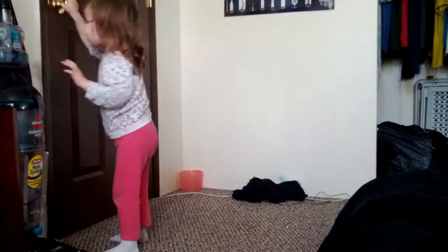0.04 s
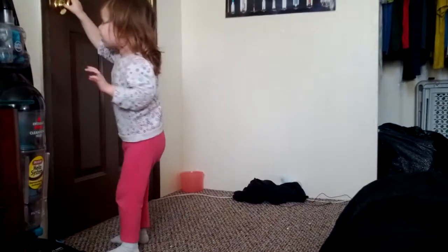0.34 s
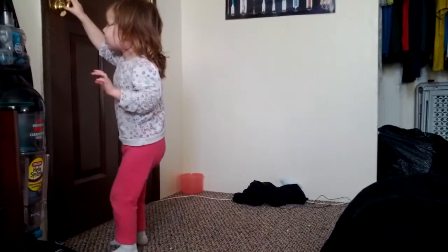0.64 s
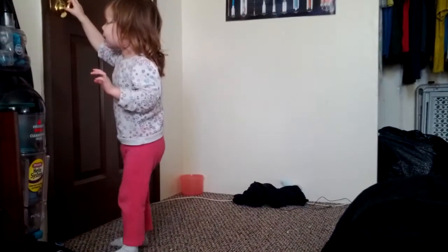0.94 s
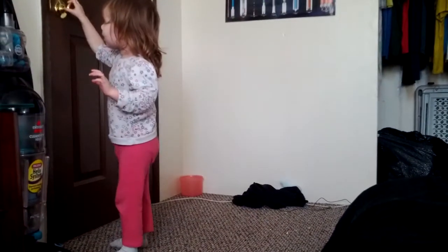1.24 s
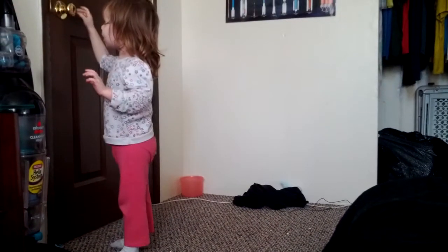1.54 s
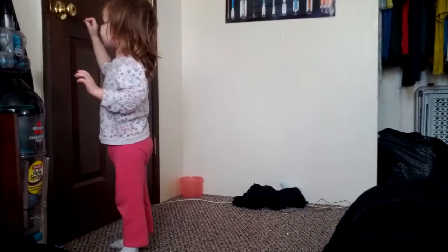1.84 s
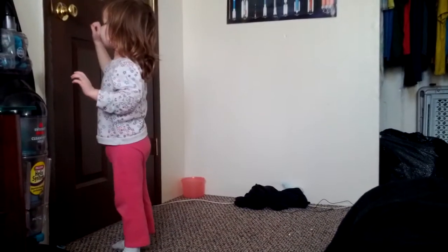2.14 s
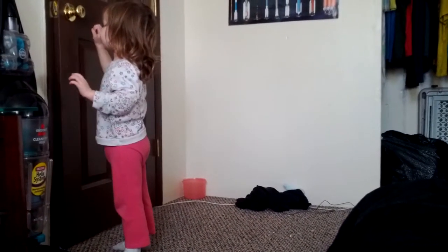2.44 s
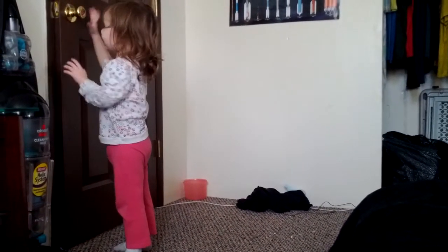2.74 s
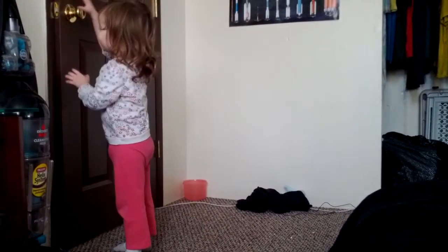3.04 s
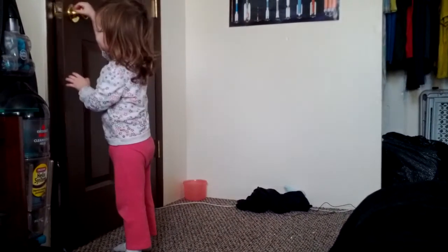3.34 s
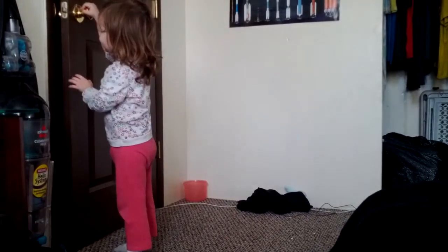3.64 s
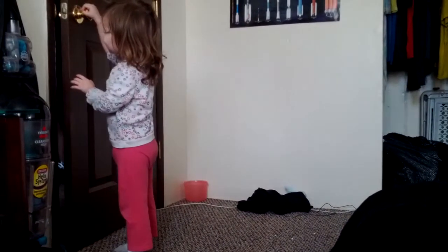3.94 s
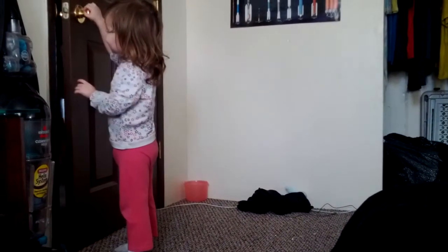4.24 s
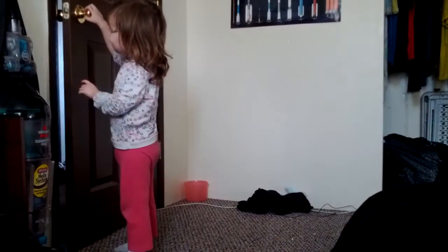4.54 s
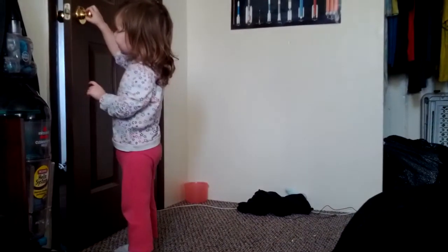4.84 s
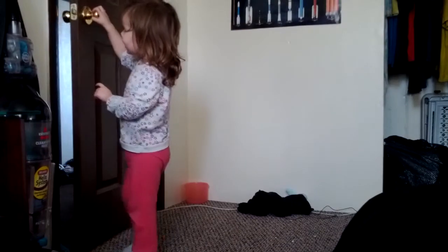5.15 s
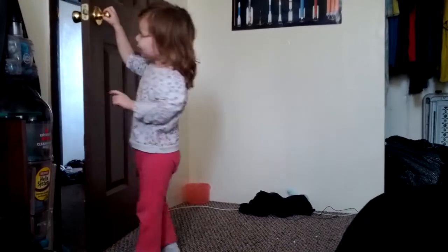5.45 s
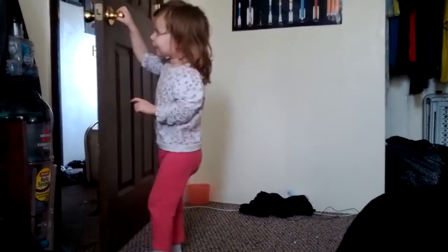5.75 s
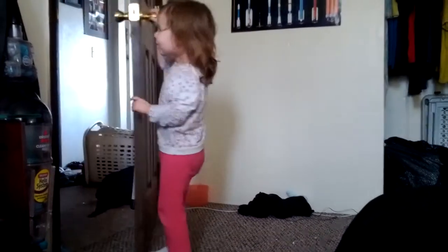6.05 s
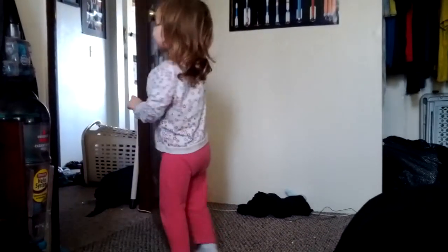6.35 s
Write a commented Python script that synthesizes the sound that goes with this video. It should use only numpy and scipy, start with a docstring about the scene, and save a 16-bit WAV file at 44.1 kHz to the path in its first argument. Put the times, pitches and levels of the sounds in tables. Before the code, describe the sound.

A wooden bedroom door is knocked about lightly as a child fiddles with its metal knob, which rattles and springs back sharply. A deep thump against the frame and a bright latch click follow. Faint brushing of clothes and feet fills a pause before the door is pulled open with a brief swish and bumps to a stop. The room rings only briefly, with soft steady hiss and a little air rumble on the microphone.

```python
"""The brass knob and latch of a wooden door, worked by a small child in a carpeted bedroom.
The knob rattles and snaps back, the door is pushed against its frame and the latch clicks home:
each impact excites damped modes of brass and wood, and the room adds a short reverberation.
Then the door is pulled open with a brief hiss of friction and bumps to a stop.
Beneath it lie the rumble of stirred air, a low house drone, steady hiss and faint camera ticks."""
import sys
import numpy as np
from scipy import signal
from scipy.fft import rfft, irfft
from scipy.io import wavfile

SR = 44100
rng = np.random.default_rng(int(sys.argv[2]) if len(sys.argv) > 2 else 0)


def wav_record(signal):
    """Record a signal, one row per channel, as 16-bit PCM in the file named by sys.argv[1]."""
    frames = np.transpose(np.atleast_2d(signal))
    bounded = np.clip(frames, -1, 1)
    # unit amplitude maps onto the largest positive 16-bit level
    quanta = np.round(bounded * 32767).astype(np.int16)
    wavfile.write(sys.argv[1], SR, quanta)


N = 287091
TIME = np.arange(N) / SR

# reverberation time of the bedroom: f/Hz, T60/s
ROOM_DECAY = [(100, 0.5), (400, 0.23), (1200, 0.32), (3000, 0.2551), (7000, 0.3139), (14000, 0.19)]
# gain of the reverberant field: f/Hz, level/dB
ROOM_GAIN = [(100, 5), (1000, -1.5), (3000, -3), (7000, -4), (11500, 0), (14000, -8.5)]
# spectrum of the microphone hiss: f/Hz, relative level/dB
HISS_SPECTRUM = [(40, -4), (90, -6), (160, -12.5), (300, -17.5), (700, -21.5), (2000, -25), (5000, -27),
                 (9500, -25.5), (12200, -21.5), (14000, -24.5)]
# dry ticks inside the camera: t/s, relative level/dB
CAMERA_TICKS = [(0.298, -24.5), (.6663, -27.5), (1.5831, -23), (2.8633, -22.5), (4.1432, -24.5),
                (5.4235, -23)]
# spectrum of a tick: f/Hz, level/dB
TICK_SPECTRUM = [(1500, -32), (4000, -15), (6500, -9.5), (9500, -9), (11000, -2.5), (12400, 2),
                 (13800, -47)]
# air pushed at the microphone by door and child: t/s, level/dB
AIR_PUFFS = [(0.0, -46.5), (1.74, -47), (2.08, -48), (2.33, -44), (3.2, -38), (4.24, -57), (4.97, -58),
             (5.99, -48.5)]
# spectrum of the stirred air: f/Hz, relative level/dB
AIR_SPECTRUM = [(6, -6.5), (16, 6.5), (30, -4), (50, -13.5), (90, -14.5), (200, -46.5), (800, -69)]
# feet and clothes brushing: centre t/s, duration/s, level/dB
BRUSHES = [(0.107, 0.46, -76), (1.155, 0.14, -66), (2.08, 0.23, -57.5), (2.373, 0.23, -55),
           (4.212, 0.095, -68.5), (4.326, 0.15, -67.5), (5.045, 0.12, -66), (5.58, 0.19, -65),
           (6.096, 0.25, -56.5), (6.467, 0.083, -65)]
# spectrum of that brushing: f/Hz, relative level/dB
BRUSH_SPECTRUM = [(60, 11), (180, 4), (450, 0.5), (800, -7), (1200, -8.5), (4000, -11.5), (13000, -19)]
# spectrum of a hand sliding over the door: f/Hz, relative level/dB
SLIDE_SPECTRUM = [(150, -33), (500, -12.5), (1400, -10.5), (3000, -11), (6000, -7), (9000, -4), (11500, 2),
                  (13500, 2.5), (15000, -7), (16000, -40)]
# knocks of hand and knob on the wood: t/s, relative level/dB, low-pass f/Hz, chatter decay/s
PANEL_KNOCKS = [(0.033, -6, 380, 0.0041), (0.076, -9.5, 350, 0.013), (1.011, -17.5, 520, 0.0065),
                (1.126, -18.5, 520, 0.0095), (1.969, -6.5, 1140, 0.0057), (2.043, -10.5, 2200, .015),
                (2.085, -18, 1400, 0.016), (2.158, -5.5, 5600, 0.0067), (2.548, -6, 1540, .01),
                (3.064, -13.5, 4030, 0.0058), (3.075, -5.5, 2700, 0.0052), (3.274, 2.5, 2300, 0.0045),
                (5.476, -23, 3010, .004), (5.988, 4, 1007, 0.0055), (6.287, -18, 900, 0.01)]
# response of the wooden panel: f/Hz, level/dB
PANEL_SPECTRUM = [(50, -20), (130, 2.5), (240, -7), (380, -2.5), (520, -5.5), (730, -5), (1020, -3.5),
                  (1450, -5.5), (2200, -4.5), (3400, -4.5), (4400, -4), (5500, -7.5), (7500, -11),
                  (10000, -10)]
# blows that shake the whole door: t/s, impulse level/dB, contact time/s
DOOR_BLOWS = [(1.75, -31, 0.006), (2.092, -21.5, 0.0045), (2.156, -19.5, 0.0035), (2.293, -22, 0.0033),
              (2.34, -24, 0.002), (2.413, -16, 0.0011), (3.2042, 2.5, 0.0021), (3.261, -12.5, 0.0027),
              (5.974, -11, 0.0025), (5.981, -4, 0.0058), (6.112, -18, 0.0056), (6.222, -31.5, 0.0036)]
# modes of the door leaf in the room: f/Hz, level/dB, T60/s
LEAF_MODES = [(50.5, -38, .5), (86.4, -38.5, 0.1), (98.8, -23.5, .26), (110, -32.5, 0.18),
              (127.2, -30.5, 0.59), (161.8, -30, 0.39), (188.5, -34, 0.33), (223, -30.5, 0.23),
              (237.9, -38, 0.37), (323.6, -45, .3), (404.4, -28.5, .2), (399.9, -33, 0.21),
              (424.7, -43.5, .27), (519, -39.5, 0.33)]
# spectrum that a blow radiates into the room: f/Hz, level/dB
BLOW_SPECTRUM = [(30, 4), (100, 17.5), (220, 15.5), (400, 17.5), (560, 7.5), (700, 3), (1500, -1),
                 (6000, -14.5)]
# modes of the wood and strike plate around the lock: f/Hz, bandwidth/Hz, level/dB
LOCK_MODES = [(230.2, 22, 12), (500, 130, -2.5), (984, 200, 7), (1392, 710, 0.5), (2000, 930, -3),
              (4400, 300, 0)]
# modes of the brass latch and knob: f/Hz, bandwidth/Hz, level/dB
BRASS_MODES = [(2600, 300, -15.5), (3910, 330, -1), (6260, 120, 5.5), (6694, 230, 2), (7400, 90, -4.5),
               (8830, 180, 3.5), (9326, 88.1, 4.5), (10810, 200, 2), (11710, 260, 4.5), (12350, 100, 5)]
# knob and latch contacts:
# t/s, relative level/dB, wood gain/dB, top treble gain/dB, chatter decay/s, brass ring gain/dB
LATCH_CONTACTS = [(2.155, -17.5, 6, -19, 0.0061, -11), (2.388, -26, 17, 3.5, .006, 8.5),
                  (2.398, -34, 13, 1.5, 0.0073, 0), (2.4103, 9, -4.5, -2, 0.002, -1),
                  (2.4151, -8, -1.5, -7, 0.0019, 4), (3.211, -19.5, 8, 2, 0.0046, -13),
                  (3.266, 0, 0.5, 3, 0.0022, -4), (3.2711, -8.5, 1.5, 10.5, 0.0021, -2.5),
                  (5.9853, -19, 3, 13, 0.005, -10), (5.999, -21.5, -11, 11.5, 0.022, -4)]


def from_db(db):
    """Amplitude ratio: a factor of ten for every 20 dB."""
    return 10 ** (np.asarray(db) / 20)


def unit_rms(x):
    """Normalisation to unit mean power."""
    return x / np.sqrt(np.mean(x ** 2) + 1e-20)


def at_hz(points, hz):
    """Interpolation of a table on a logarithmic frequency axis."""
    f, value = np.transpose(points)
    return np.interp(np.log(np.maximum(hz, 1)), np.log(f), value)


def onset(s, attack_s):
    """Linear attack from zero to one, starting at time s."""
    return np.clip((TIME - s) / attack_s, 0, 1)


def swell(s, length_s):
    """Gaussian envelope centred on time s."""
    return np.exp(-(2 * (TIME - s) / length_s) ** 2)


def add(track, s, sound):
    """Superposition of a sound on a track at time s."""
    start = int(s * SR)
    track[start:start + len(sound)] += sound[:N - start]


def convolve(x, response):
    """A linear system convolves its input with its impulse response."""
    return signal.fftconvolve(x, response)[:len(x)]


def coloured(x, spectrum, size=8192):
    """Minimum-phase filtering: folding the cepstrum makes the given spectrum causal."""
    gain = from_db(at_hz(spectrum, np.fft.rfftfreq(size, 1 / SR)))
    cepstrum = irfft(np.log(gain))
    cepstrum[1:size // 2] *= 2
    cepstrum[size // 2 + 1:] = 0
    return convolve(x, irfft(np.exp(rfft(cepstrum))))


def resonance(x, hz, width_hz):
    """A damped two-pole resonator with unit peak gain."""
    radius = np.exp(-np.pi * width_hz / SR)
    numerator = np.array([1, 0, -1]) * (1 - radius ** 2) / 2
    denominator = [1, -2 * radius * np.cos(2 * np.pi * hz / SR), radius ** 2]
    return signal.lfilter(numerator, denominator, x + 1e-18)


def ring(contact, modes, uneven_db):
    """Modal superposition: each contact excites the modes with random strengths of its own."""
    return sum(from_db(db + uneven_db * rng.standard_normal()) * resonance(contact, hz, width)
               for hz, width, db in modes)


def chatter(decay_s, size=4096):
    """Contact chatter: tiny impacts merge into a decaying broadband burst of unit energy."""
    t = TIME[:size]
    envelope = (1 - np.exp(-4 * t / decay_s)) * np.exp(-t / decay_s)
    spectrum = rfft(rng.standard_normal(size) * envelope)
    whitened = irfft(spectrum / np.abs(spectrum))
    burst = whitened * np.sqrt(envelope)
    return burst / np.linalg.norm(burst)


def friction(spectrum, grain_db):
    """Friction noise: dense slips whose sizes scatter by grain_db."""
    slips = rng.standard_normal(N) * from_db(grain_db * rng.standard_normal(N))
    return unit_rms(coloured(slips, spectrum))


def bedroom(x, first_echo_s=0.00035, build_s=0.0041):
    """Diffuse reverberation: reflections build up, then decay exponentially at each band's own rate."""
    t, response = TIME[:SR], 0
    build_up = onset(first_echo_s, build_s)[:SR]
    edges = np.geomspace(40, 18000, 16)
    for low, high in zip(edges, edges[1:]):
        hz = np.sqrt(low * high)
        bandpass = signal.butter(2, (low, high), "band", fs=SR, output="sos")
        noise = signal.sosfilt(bandpass, rng.standard_normal(SR))
        tail = noise * build_up * from_db(-60 * t / at_hz(ROOM_DECAY, hz))
        gain = np.sqrt(2 * (high - low) / SR) * from_db(at_hz(ROOM_GAIN, hz))
        response = response + gain * tail / np.linalg.norm(tail)
    return convolve(x, response)


def background(hiss_db=-66, hiss_cutoff_hz=14100, drone_db=-71):
    """Stationary noise: broadband microphone hiss and a narrowband drone in the house."""
    hiss = coloured(rng.standard_normal(N), HISS_SPECTRUM)
    hiss = signal.sosfilt(signal.ellip(8, .5, 60, hiss_cutoff_hz, fs=SR, output="sos"), hiss)
    drone = resonance(rng.standard_normal(N), hz=76, width_hz=9)
    return from_db(hiss_db) * unit_rms(hiss) + from_db(drone_db) * unit_rms(drone)


def camera_ticks(decay_s=0.00024):
    """Direct sound only: tiny clicks right at the microphone carry no reverberation."""
    clicks = np.zeros(N)
    for s, db in CAMERA_TICKS:
        add(clicks, s, from_db(db) * chatter(decay_s))
    return coloured(clicks, TICK_SPECTRUM)


def buffeting(attack_s=0.036, fall_after_s=0.096, fall_db_per_s=47.5, still_air_db=-64.5):
    """Incoherent sources add in power: each puff of air rises, holds and dies into a low rumble."""
    power = from_db(still_air_db) ** 2
    for s, db in AIR_PUFFS:
        fallen_db = fall_db_per_s * np.maximum(TIME - s - fall_after_s, 0)
        power = power + (onset(s, attack_s) * from_db(db - fallen_db)) ** 2
    return np.sqrt(power) * unit_rms(coloured(rng.standard_normal(N), AIR_SPECTRUM))


def air_sway(s=3.24, hz=4.32, t60=2.03, db=-31):
    """Damped infrasonic oscillation of the closed room's air as the door meets its frame."""
    t = np.maximum(TIME - s, 0)
    return -from_db(db - 60 * t / t60) * np.sin(2 * np.pi * hz * t)


def rubbing(slide_db=-38, room_db=-5):
    """Sliding friction grows with speed: a hand hisses over the door, feet and clothes brush dully."""
    # the hand catches abruptly, speeds up and slows to rest
    speed = onset(s=5.685, attack_s=0.002) * swell(s=5.738, length_s=0.11)
    slide = from_db(slide_db) * speed * friction(SLIDE_SPECTRUM, grain_db=3.5)
    strokes = sum(from_db(db) * swell(s, length_s) for s, length_s, db in BRUSHES)
    rubs = slide + strokes * friction(BRUSH_SPECTRUM, grain_db=6.5)
    return rubs + from_db(room_db) * bedroom(rubs)


def panel_knocks(direct_db=-5, hollow_db=-2):
    """Soft contacts low-pass the force on a resonant hollow panel, heard mostly by reflection."""
    force = np.zeros(N)
    for s, db, cutoff_hz, decay_s in PANEL_KNOCKS:
        lowpass = signal.butter(1, cutoff_hz, fs=SR)
        add(force, s, from_db(db) * signal.lfilter(*lowpass, chatter(decay_s)))
    hollow = from_db(hollow_db) * resonance(force, hz=450, width_hz=190)
    taps = coloured(force, PANEL_SPECTRUM) + hollow
    return from_db(direct_db) * taps + bedroom(taps)


def door_thuds():
    """Impact excitation of the door leaf: the longer the contact, the weaker the high modes."""
    force, t = np.zeros(N), TIME[:SR]
    for s, db, contact_s in DOOR_BLOWS:
        push = np.sin(np.pi * np.minimum(t / contact_s, 1)) ** 2
        add(force, s, from_db(db) * push / push.sum())
    leaf = sum((-1) ** k * from_db(db - 60 * t / t60) * np.sin(2 * np.pi * hz * t)
               for k, (hz, db, t60) in enumerate(LEAF_MODES))
    return convolve(force, leaf) + bedroom(coloured(force, BLOW_SPECTRUM))


def knob_squeak(s=2.5, length_s=0.18, hz=2700, width_hz=420, db=-74):
    """Narrowband noise is heard as a faint, thin squeak while the knob settles."""
    rub = resonance(rng.standard_normal(N), hz, width_hz)
    narrowed = resonance(rub, hz, width_hz)
    return from_db(db) * swell(s, length_s) * unit_rms(narrowed)


def knob_and_latch(contact_db=-3, beam_hz=4500, wood_direct_db=-9):
    """Free vibration after impact: chattering brass rings briefly and the wood around the lock clacks."""
    metal, wood = np.zeros((2, N))
    for s, db, wood_db, top_db, decay_s, brass_db in LATCH_CONTACTS:
        contact = from_db(db + contact_db) * chatter(decay_s)
        crack = coloured(contact, [(100, -5.5), (1200, -4.5), (2400, 5), (8500, 2.5),
                                   (13200, top_db), (15500, top_db - 7.5)])  # f/Hz, level/dB
        add(metal, s, crack + from_db(brass_db) * ring(crack, BRASS_MODES, uneven_db=3.5))
        add(wood, s, from_db(wood_db) * ring(contact, LOCK_MODES, uneven_db=1.5))
    # directivity: the metal's treble beams at the microphone, the wood arrives more by way of the walls
    beamed = signal.lfilter(*signal.butter(1, beam_hz, "high", fs=SR), metal)
    return beamed + from_db(wood_direct_db) * wood + bedroom(metal + wood)


def scene():
    """Superposition: the pressures of all sources add at one microphone."""
    door = knob_and_latch() + knob_squeak() + panel_knocks() + door_thuds()
    return (door + air_sway() + rubbing() + camera_ticks() + background() + buffeting())[None]


def record(dry):
    """Band limiting: a steep low-pass removes the highest treble."""
    cutoff_hz = 15800
    return signal.sosfilt(signal.ellip(10, .2, 80, cutoff_hz, fs=SR, output="sos"), dry)


dry = scene()
out = record(dry)
wav_record(out)
```